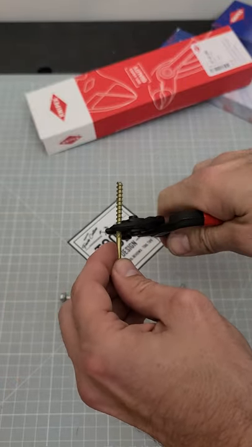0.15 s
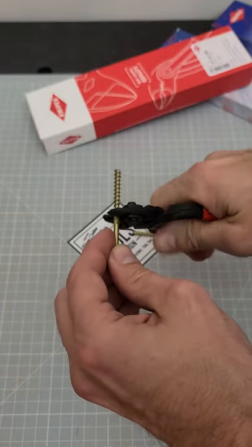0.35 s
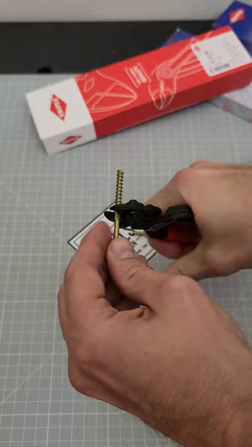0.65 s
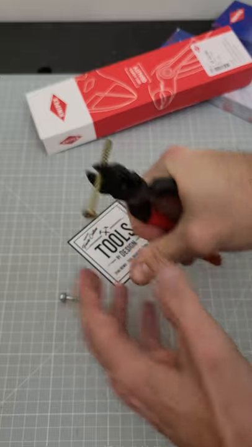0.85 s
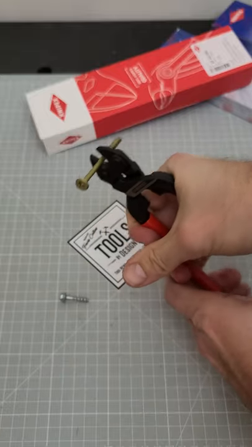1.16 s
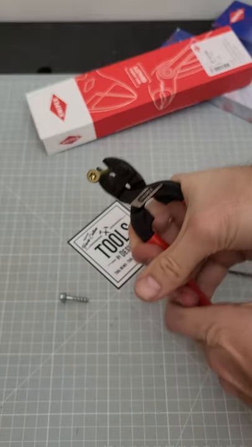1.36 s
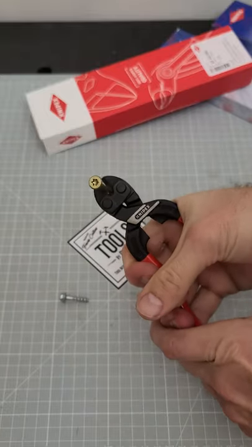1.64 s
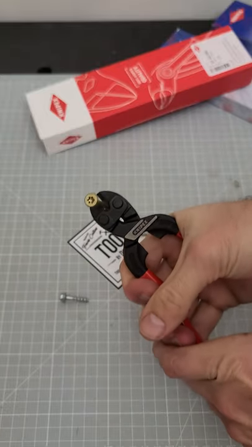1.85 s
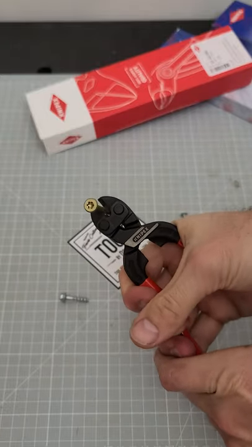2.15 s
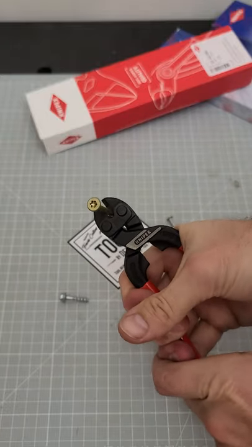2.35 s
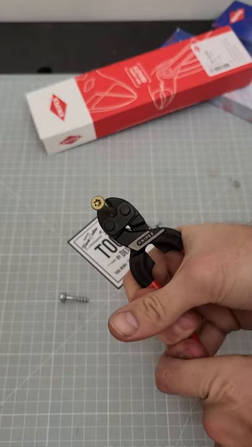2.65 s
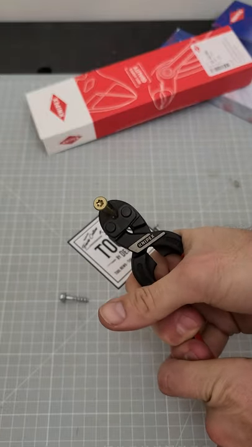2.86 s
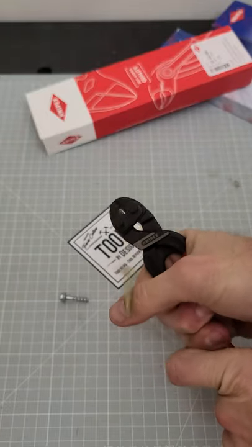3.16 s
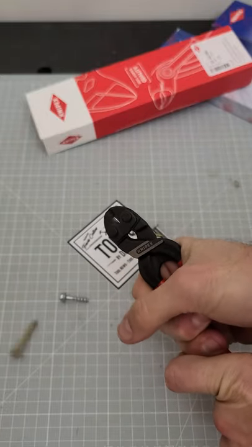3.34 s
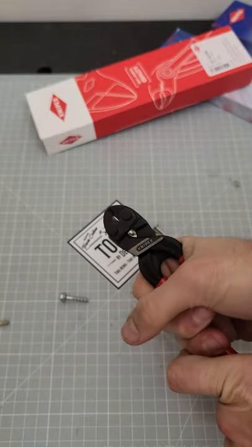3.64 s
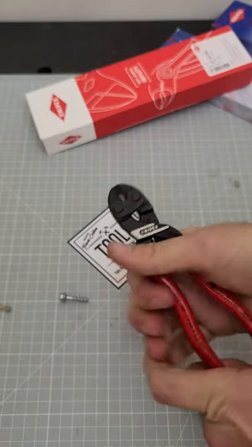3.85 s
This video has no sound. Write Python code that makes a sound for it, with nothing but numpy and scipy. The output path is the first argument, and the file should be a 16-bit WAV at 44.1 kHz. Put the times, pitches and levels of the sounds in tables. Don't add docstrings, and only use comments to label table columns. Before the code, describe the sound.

Small bolt cutters shear a steel screw: faint finger ticks and a distant scrap rolling, short creaks under load, one sharp ringing snap, then halves bounce on the table and floor. Quiet small room, close stereo microphone.

```python
import sys
import numpy as np
from scipy import signal
from scipy.fft import rfft, irfft
from scipy.io import wavfile
from scipy.ndimage import uniform_filter1d

SR = 44100
rng = np.random.default_rng(int(sys.argv[2]) if len(sys.argv) > 2 else 0)


def attenuation_scalar(level_db):
    decades = np.asarray(level_db, float) / 20
    return 10 ** decades


def generate_wav(sig):
    pcm = np.round(np.clip(np.atleast_2d(sig).T, -1, 1) * 32767).astype(np.int16)
    wavfile.write(sys.argv[1], SR, pcm)


N = 176400

# pitch_hz, level_db, t60_s
TABLE_MODES = [(102, -30, 0.074), (245, -22, 0.09), (303, -13.5, 0.03), (458, -19.5, 0.07),
               (619, -12, 0.034), (968, -11.5, 0.023), (1520, -45, 0.076)]


def evened(x):
    return x / np.sqrt(np.mean(x ** 2) + 1e-30)


def read(points, hz):
    f, value = np.transpose(points)
    return np.interp(np.log(hz + 1), np.log(f + 1), value)


def add(mix, s, sound):
    part = mix[round(s * SR):][:len(sound)]
    part += sound[:len(part)]


def above(x, hz, order=2):
    return signal.sosfilt(signal.butter(order, hz, "high", fs=SR, output="sos"), x)


def resonate(x, hz, width):
    turn = np.exp(2j * np.pi * hz * np.arange(x.shape[-1]) / SR)
    r = np.exp(-np.pi * width / SR)
    for _ in range(2):
        x = 2 * (turn * signal.lfilter([1 - r], [1, -r], x / turn)).real
    return x


def modes(table, size=8000):
    t = np.arange(size) / SR
    return sum(attenuation_scalar(db - 60 * t / t60) * np.sin(2 * np.pi * hz * t) for hz, db, t60 in table)


def fizz(lo_hz, hi_hz, fall_s, size=8000, order=2):
    sos = signal.butter(order, [lo_hz, min(hi_hz, 18000)], "band", fs=SR, output="sos")
    burst = rng.standard_normal(size) * np.exp(-np.arange(size) / SR / fall_s)
    return signal.sosfilt(sos, burst)


def grains(spread_db, per_s):
    strength = attenuation_scalar(spread_db * np.minimum(rng.exponential(1, N), 4))
    return evened(rng.standard_normal(N) * strength * (rng.random(N) < per_s / SR))


def knock(db, hz, tick_db, cycles, body_db, tick_hz, body=TABLE_MODES):
    t = np.arange(8000) / SR
    soft = 1 - np.exp(-t / .00008)
    push = -2.2 * np.sin(2 * np.pi * hz * t) * np.exp(-t * hz / cycles)
    chatter = attenuation_scalar(-6) * fizz(0.65 * hz, 1.66 * hz, 0.0035)
    blunt = soft * (push + chatter + attenuation_scalar(body_db) * modes(body))
    return attenuation_scalar(db) * (blunt + attenuation_scalar(tick_db) * fizz(2900, tick_hz, 0.00087))


def air():
    # pitch_hz, level_db
    air_colour = [(20, -22.5), (43, -3.5), (180, -12), (500, -18.5), (1300, -24.5), (3000, -33),
                  (6500, -47.5), (16000, -55.5)]
    # pitch_hz, likeness
    likeness = [(60, 0.72), (240, 0.64), (950, 0.43), (3770, .05), (15000, .03)]
    # pitch_hz, width_hz, level_db
    hum_partials = [(52, 6.6, -67.5), (148.1, 3.3, -71), (305.2, 16, -77.5), (437, 1.3, -79.5)]
    hiss_lift_hz, hiss_lift_db = 8540, 14
    frames, hz = N // 512 + 5, np.fft.rfftfreq(2048, 1 / SR)
    a, b, c, d, patches = rng.standard_normal((frames, 1025, 5)).T
    patches = evened(uniform_filter1d(uniform_filter1d(patches, 20, 0), 8, 1))
    same = np.clip(read(likeness, hz), -1, 1)[:, None]
    left = a + 1j * b
    z = np.array([left, same * left + np.sqrt(1 - same ** 2) * (c + 1j * d)])
    colour_db = read(air_colour, hz) + hiss_lift_db * (hz > hiss_lift_hz)
    z *= attenuation_scalar(colour_db[:, None] + 1.03 * patches)
    noise = evened(signal.istft(z, nperseg=2048, noverlap=1536)[1][:, :N])
    hum = 0
    for f, width, db in hum_partials:
        turn, r = np.exp(2j * np.pi * f * np.arange(N) / SR), np.exp(-np.pi * width / SR)
        line = 2 * (turn * signal.lfilter([1 - r], [1, -r], rng.standard_normal(N) / turn)).real
        hum = hum + attenuation_scalar(db) * evened(line)
    return attenuation_scalar(-66) * noise + hum


def clatter():
    # start_s, level_db
    knocks = [(0.9847, -54.5), (0.9947, -52), (1.0183, -53), (1.043, -59), (1.0716, -52), (1.1334, -51),
              (1.17, -78), (1.228, -50.5), (1.267, -49.5), (1.3207, -42.5), (1.3528, -70), (1.3985, -73)]
    # pitch_hz, width_hz, level_db
    scrap_body = [(1400, 240, 2), (1693, 325, 11), (2080, 194, 4), (2450, 220, 13), (2930, 95, 2.5),
                  (4340, 250, -30)]
    top_hz, dulls_hz_per_s = 3970, 9800
    taps = np.zeros(N)
    for s, db in knocks:
        tap = fizz(810, top_hz - dulls_hz_per_s * max(s - 1.1, 0), 0.006, size=2000)
        add(taps, s, attenuation_scalar(db + 3) * tap)
    return sum(attenuation_scalar(db) * resonate(taps, hz, 3.16 * width) for hz, width, db in scrap_body)


def roll():
    # time_s, level_db, brightness (0-1)
    course = [(.975, -80, .3), (1.0, -67.5, 0.4), (1.14, -60.5, 0.6), (1.2, -58.5, 0.7), (1.24, -54, 0.92),
              (1.349, -54, 0.62), (1.5, -55.5, 0.7), (1.75, -60.5, 0), (2.03, -64, 0.3), (2.15, -86, .1)]
    # pitch_hz, width_hz, level_db
    roll_body = [(413, 114, -4.5), (643, 117, -1.5), (742, 140, -3), (980, 110, -3), (1196, 80, -4),
                 (1680, 170, -2), (2700, 430, -4)]
    s, level_db, bright = np.transpose(course)
    t = np.arange(N) / SR
    contact = grains(2.9, 1200)
    dull = 1 - np.interp(t, s, bright)
    body = 0
    for hz, width, db in roll_body:
        octaves = np.log2(max(hz / 800, 1))
        body = body + attenuation_scalar(db - 31 * dull * octaves) * evened(resonate(contact, hz, 1.17 * width))
    return 0.62 * body * attenuation_scalar(np.interp(t, s, level_db, -120, -120))


def rub():
    # time_s, level_db
    course = [(.14, -90), (.2, -67), (.33, -69.5), (.45, -70.5), (.53, -65), (.58, -70.5), (.65, -61.5),
              (.72, -77), (.76, -96)]
    # pitch_hz, width_hz, level_db
    mat = [(760, 90, -5.5), (950, 130, -7.5), (1150, 100, -3.5), (1340, 50, 2), (1500, 64, -12)]
    s, level_db = np.transpose(course)
    slips = grains(2.4, 2500)
    body = sum(attenuation_scalar(db) * evened(resonate(slips, hz, width)) for hz, width, db in mat)
    return evened(body) * attenuation_scalar(np.interp(np.arange(N) / SR, s, level_db, -120, -120))


def bumps():
    # start_s, level_db, pitch_hz
    wrists = [
        (0.169, -55.5, 97.4),
        (.62, -61, 154),
        (0.999, -52.5, 89.7),
        (1.32, -58, 95),
    ]
    out, t = np.zeros(N), np.arange(8000) / SR
    for s, db, hz in wrists:
        add(out, s, attenuation_scalar(db) * np.sin(2 * np.pi * hz * t) * t / 0.036 * np.exp(1 - t / 0.026))
    return out


def ticks():
    # start_s, level_db
    fingers = [(0.06, -56), (0.11, -50.5), (0.129, -52), (0.1883, -46), (0.2023, -46.5), (0.2569, -47),
               (0.619, -52), (0.82, -60)]
    out = np.zeros(N)
    for s, db in fingers:
        add(out, s, attenuation_scalar(db - 13) * fizz(1200, 11000, 0.0031))
    return out


def creaks():
    # start_s, level_db, fizz_db (high fizz), mid_db (share of the upper mode)
    slips = [
        (2.41, -57.5, 7, 17),
        (2.452, -59, 5, 13),
        (2.49, -65, 2, 4),
        (2.519, -58.5, 3, 7),
        (2.566, -45.5, -0.5, -8),
        (2.653, -39.5, -4.5, -2),
        (2.702, -39.5, -8, -3),
        (2.816, -40.5, -9.5, 1.5),
        (2.935, -43.5, -7, -2),
        (3.047, -63.5, -8, 5.5),
    ]
    # pitch_hz, level_db, t60_s
    joint = [(663, -6.5, 0.018), (850, 3, 0.0071), (1100, -11.5, .008), (1620, -8.5, 0.0092),
             (3560, -9.5, 0.006), (4300, -11, .006)]
    out = np.zeros(N)
    for s, db, fizz_db, mid_db in slips:
        ring = above(modes(joint) + attenuation_scalar(mid_db) * modes([(1530, -6, 0.011)]), 590, order=4)
        high = attenuation_scalar(fizz_db - 0.5) * fizz(10000, 14300, 0.0027)
        bite = attenuation_scalar(-1) * fizz(2300, 5200, .0015, order=4)
        rasp = attenuation_scalar(-12) * fizz(3000, 4700, .035, order=4)
        add(out, s, attenuation_scalar(db - 4.5) * (ring + high + bite + rasp))
    return out


def skitter():
    # time_s, level_db, top_hz
    course = [(3.57, -76, 6900), (3.6, -56.5, 6260), (3.658, -47.5, 4670), (3.721, -55, 3600),
              (3.79, -76, 2500)]
    s, level_db, top_hz = np.transpose(course)
    hz, t, z = signal.stft(grains(2.5, 1500), SR, nperseg=256)
    z = z * (hz / (hz + 300))[:, None] / (1 + (hz[:, None] / np.interp(t, s, top_hz)) ** 6)
    return signal.istft(z * attenuation_scalar(np.interp(t, s, level_db, -120, -120)), SR, nperseg=256)[1][:N]


def late_bounces():
    # start_s, level_db, pitch_hz, tick_db (steel tick)
    bounces = [(1.985, -59, 850, -40), (3.5475, -29, 1900, -30), (3.557, -42, 630, -19),
               (3.592, -29.5, 2880, -18), (3.6, -47, 640, -29), (3.634, -39, 650, -20),
               (3.65, -37, 2290, -25), (3.675, -42, 915, -26), (3.702, -35, 1340, -29),
               (3.709, -44, 680, -25), (3.732, -44, 710, -26)]
    out = skitter()
    for s, *row in bounces:
        add(out, s, knock(*row, cycles=0.8, body_db=-4.5, tick_hz=7300))
    return above(out, 150)


def floor_hits():
    # start_s, level_db, pitch_hz, tick_db (steel tick)
    landings = [
        (3.8125, -13, 1420, -35),
        (3.8195, -19.5, 1500, -45),
        (3.829, -34, 710, -25),
        (3.834, -21, 601, -24),
    ]
    # pitch_hz, level_db, t60_s
    board = [(240, -10, .16), (305.6, -8.5, .09), (454, -8, .09), (550, -8, .06), (619.5, -2, .07),
             (800, -10.5, .04), (980, -5, .04), (1157, -8, .06), (1500, -14, .05), (1900, -14, .05)]
    out = np.zeros(N)
    for s, *row in landings:
        add(out, s, knock(*row, cycles=1.02, body_db=-9.0, tick_hz=7000, body=board))
    return above(above(out, 170), 150)


def table_drops():
    # start_s, level_db, pitch_hz, tick_db (steel tick)
    drops = [
        (3.212, -18.5, 750, -12),
        (3.2309, -16, 1300, -12),
        (3.3683, -15, 2700, -23.5),
        (3.3749, -6.5, 2480, -6),
        (3.3773, -15.5, 3080, -6.5),
        (3.3797, -19, 800, -23),
        (3.387, -31, 900, -14),
        (3.392, -30, 1500, -17),
        (3.4455, -24.5, 790, -11),
    ]
    out = np.zeros(N)
    for s, *row in drops:
        add(out, s, knock(*row, cycles=0.47, body_db=-8.0, tick_hz=11900))
    return above(out, 100)


def rings():
    # start_s, pitch_hz, level_db, t60_s, tumble_per_s, rise_s
    partials = [
        (3.125, 11870, -41, .5, 22, .004),
        (3.14, 9895, -43, .9, 24, .01),
        (3.385, 9900, -35, .42, 9, .045),
        (3.59, 11870, -64, .4, 5, .09),
    ]
    sway_depth = .35
    out, t = np.zeros((2, N)), np.arange(SR // 2) / SR
    for s, hz, db, t60, tumble, rise in partials:
        for side, turn in zip(out, rng.random(2)):
            sway = 1 + sway_depth * np.sin(2 * np.pi * (tumble * t + turn))
            stop = np.clip((.26 - t) / 0.044, 0, 1) * np.minimum(t / rise, 1)
            tone = np.sin(2 * np.pi * (hz * t + turn / 6))
            add(side, s, attenuation_scalar(db - 60 * t / t60) * sway * stop * tone)
    return out


def snap():
    # pitch_hz, level_db
    crack_colour = [(88, -39), (200, -25), (900, -13), (2310, -3), (4600, -5), (7220, -21.5), (10500, -7.5),
                    (15300, -17), (16500, -31)]
    # delay_s, level_db, pitch_hz (short ring), ring_db
    cracks = [
        (0, -2, 1715, -10),
        (.0007, -4, 3600, -16),
        (.0021, -1, 2300, -6),
        (.0038, -6, 4196, -17.5),
    ]
    # pitch_hz, level_db, t60_s
    jaws = [(1640, -18, 0.016), (2367, -33, 0.17), (3730, -28.5, .04), (6000, -32.5, .05),
            (8180, -27, 0.022), (10400, -36.5, .03), (12580, -26, 0.052)]
    snap_s, snap_db, fall_s, lead_s = 3.1240, -14.5, 0.00042, .001
    t = np.arange(8192) / SR
    colour = attenuation_scalar(read(crack_colour, np.fft.rfftfreq(8192, 1 / SR)))
    envelope = 0
    for s, db, *_ in cracks:
        since = t - lead_s - s
        envelope = envelope + attenuation_scalar(db) * (since > 0) * np.exp(-abs(since) / fall_s)
    burst = rng.standard_normal(8192) * envelope
    for s, db, *_ in cracks:
        burst[round((lead_s + s) * SR)] += 2.7 * attenuation_scalar(db)
    crack = irfft(rfft(burst) * colour)
    out, blow = np.zeros(N), np.zeros(N)
    add(out, snap_s - lead_s, attenuation_scalar(snap_db) * crack / np.std(crack[44:200]))
    add(out, snap_s, modes(jaws))
    for s, _, hz, db in cracks:
        add(out, snap_s + s, modes([(hz, db, .006)]))
    give = np.arange(-1600, 0) / SR
    hiss = evened(above(rng.standard_normal(1600), 1500))
    add(out, snap_s - 1600 / SR, attenuation_scalar(-34) * np.exp(give / 0.0086) * hiss)
    click = np.roll(irfft(colour), 100)[:400]
    add(blow, snap_s, attenuation_scalar(9.5) * click / np.linalg.norm(click))
    out = above(out, 320)
    return out, blow + 0.4 * out


def nearby(x):
    taps = np.zeros((2, 200))
    np.put_along_axis(taps, rng.integers(6, 200, (2, 7)), 0.48 * rng.choice([-1., 1.], (2, 7)), 1)
    taps = taps * np.exp(-np.arange(200) / 90)
    taps[:, 0] = 1
    return signal.oaconvolve(x, taps, axes=1)[:, :N]


def room(x):
    # pitch_hz, t60_s
    decay = [(150, 0.58), (400, 0.38), (1000, 0.36), (2800, 0.45), (7000, 0.29), (15000, 0.23)]
    # pitch_hz, level_db
    room_colour = [(150, -5), (500, -2.5), (2000, -0.03), (6000, 0), (15000, 5.5)]
    gap_s, rise_s = 0.0013, 0.0023
    taps = np.zeros((2, SR))
    at = np.arange(80, SR - 20, 12) + rng.integers(0, 12, (2, (SR - 89) // 12))
    np.put_along_axis(taps, at, rng.choice([-1., 1.], at.shape), 1)
    hz, t, z = signal.stft(taps, SR, nperseg=256)
    same = 1 / (1 + (hz[:, None] / 450) ** 2)
    z = np.array([z[0], same * z[0] + np.sqrt(1 - same ** 2) * z[1]])
    fall_db = read(room_colour, hz)[:, None] - 60 * t / read(decay, hz)[:, None]
    z = z * attenuation_scalar(fall_db) * (hz < 15900)[:, None]
    tail = signal.istft(z, SR, nperseg=256)[1][:, :SR]
    tail = tail * np.clip((np.arange(SR) / SR - gap_s) / rise_s, 0, 1)
    return signal.fftconvolve(x[None], tail / np.linalg.norm(tail[0]), axes=1)[:, :N]


def scene():
    far, far_taps, hand = roll(), clatter(), rub()
    near = creaks() + ticks() + bumps()
    late, floor, table = late_bounces(), floor_hits(), table_drops()
    cut, blow = snap()
    wet = blow + attenuation_scalar(-8.5) * near + attenuation_scalar(1.5) * far + attenuation_scalar(-1) * far_taps + attenuation_scalar(-3) * hand
    below = attenuation_scalar(0.5) * table + attenuation_scalar(-2.0) * floor + attenuation_scalar(4.5) * late
    aside = attenuation_scalar(-5.0) * far + attenuation_scalar(-3) * far_taps + attenuation_scalar(-1.5) * hand
    dry = (cut + near) * attenuation_scalar([[-.3], [.3]]) + table * attenuation_scalar([[.4], [-.4]]) + attenuation_scalar(-0.5) * late
    dry = dry + np.array([aside, np.roll(aside, 5)])
    dry = dry + np.array([attenuation_scalar(2.5) * floor, attenuation_scalar(-3.5) * np.roll(floor, 15)])
    return nearby(dry) + room(wet) + room(below) + rings() + air()


def roll_off(x):
    return signal.sosfilt(signal.butter(12, 16970, fs=SR, output="sos"), x)


def record(dry):
    mid = dry.mean(0)
    side = above((dry[0] - dry[1]) / 2, 170)
    pair = np.array([attenuation_scalar(0.72) * mid + side, attenuation_scalar(-0.47) * mid - side])
    band = signal.firwin(255, 16500, window=("kaiser", 9), fs=SR)
    mix = signal.oaconvolve(pair, band[None], "same")
    return roll_off(mix)


dry = scene()
out = record(dry)
generate_wav(out)
```